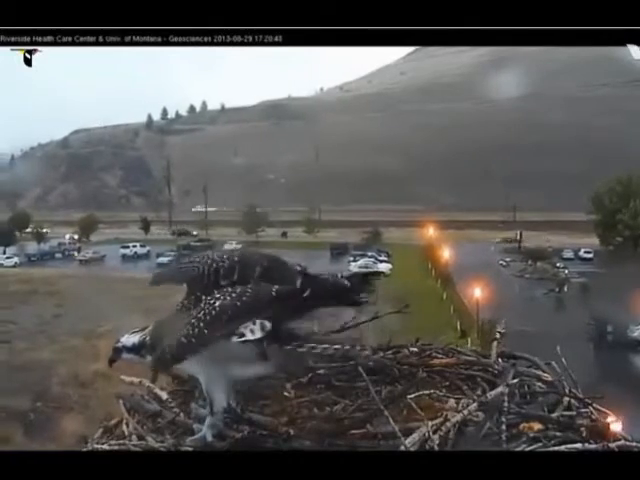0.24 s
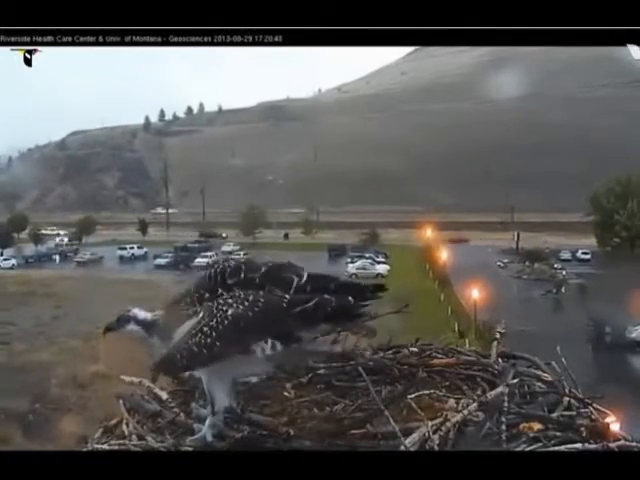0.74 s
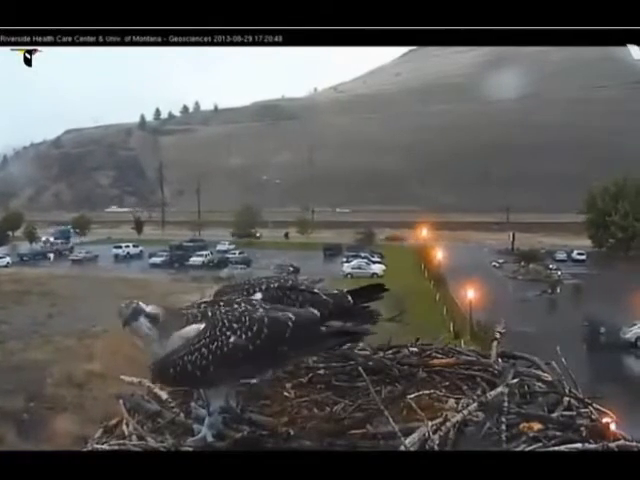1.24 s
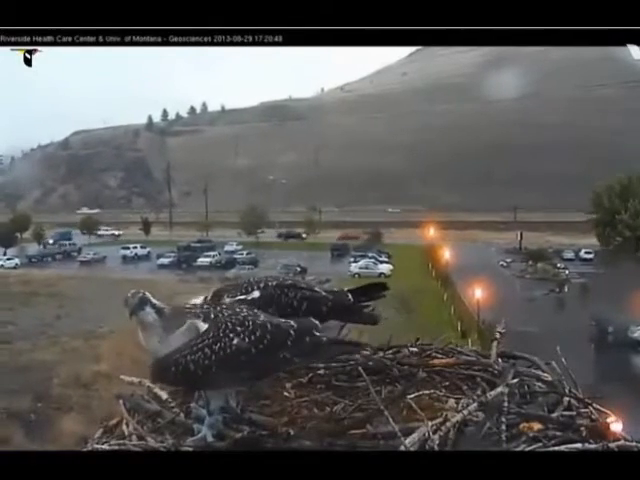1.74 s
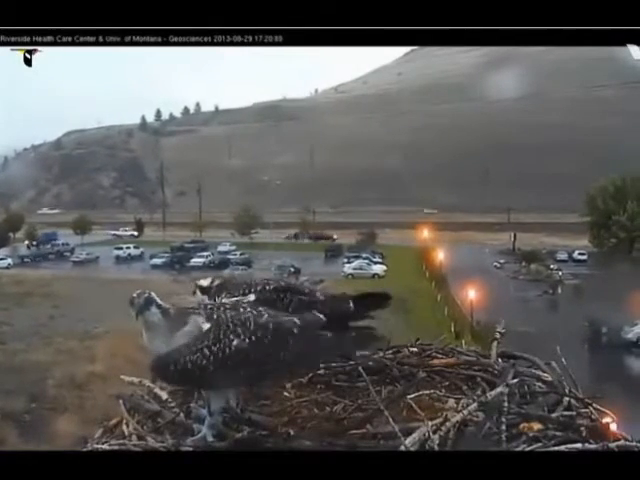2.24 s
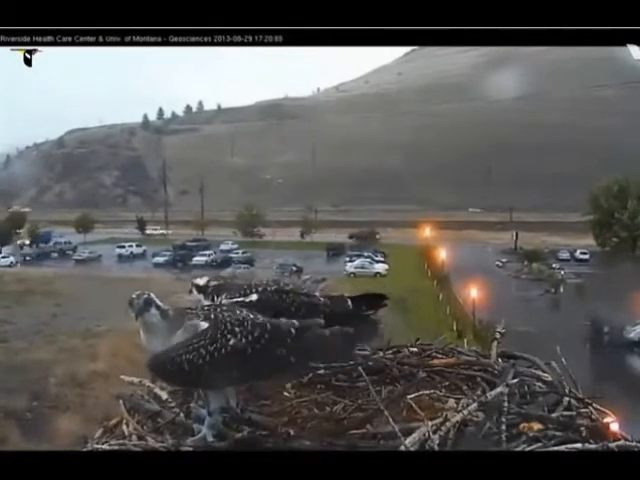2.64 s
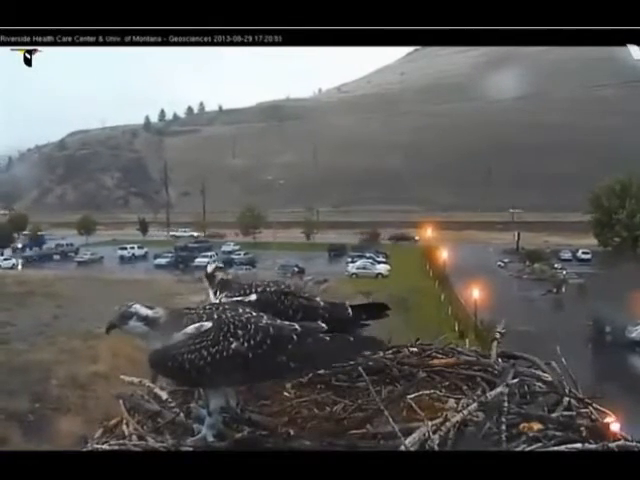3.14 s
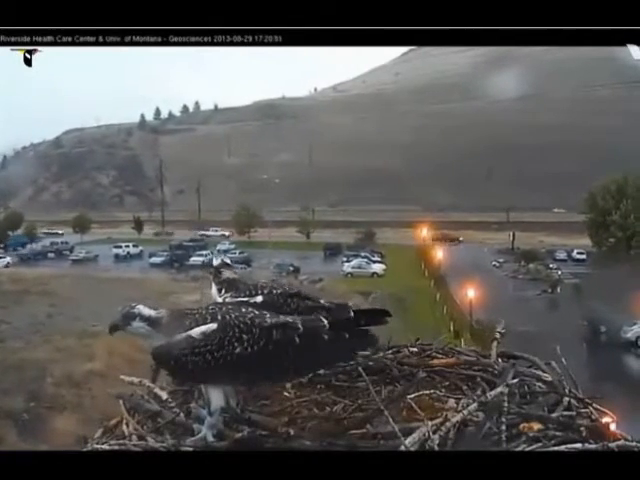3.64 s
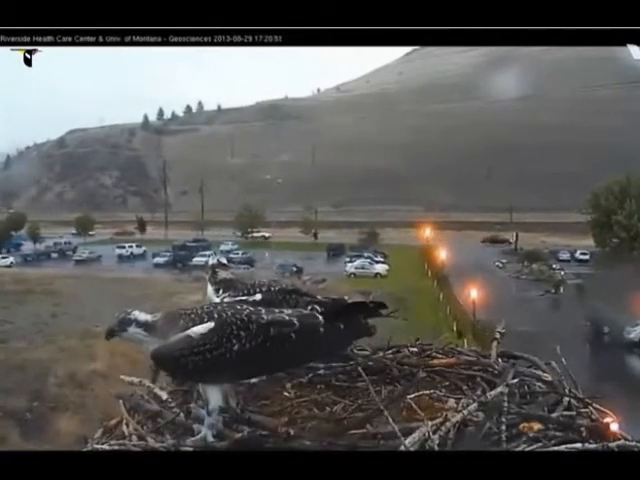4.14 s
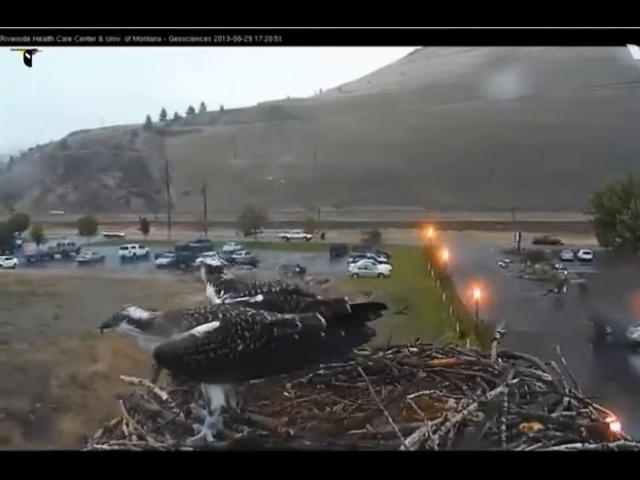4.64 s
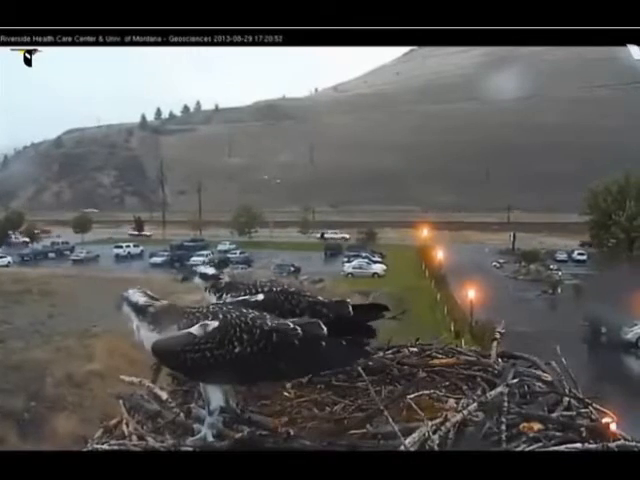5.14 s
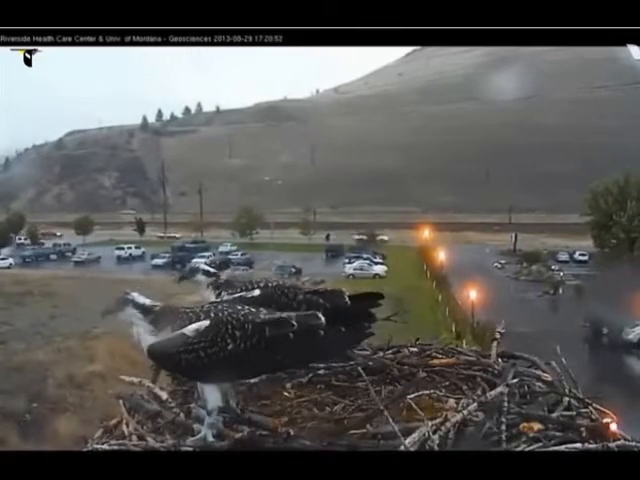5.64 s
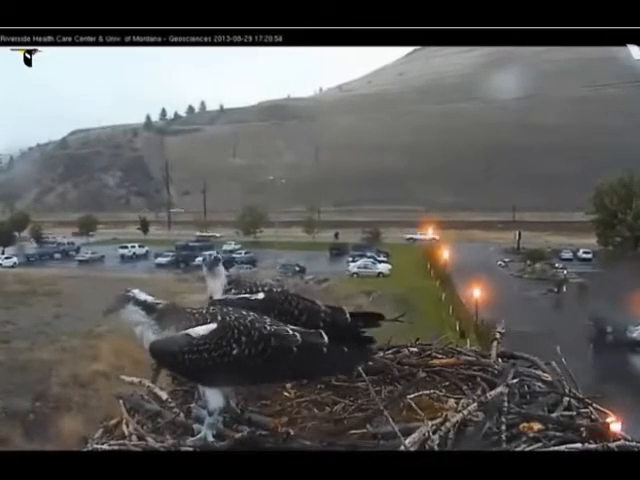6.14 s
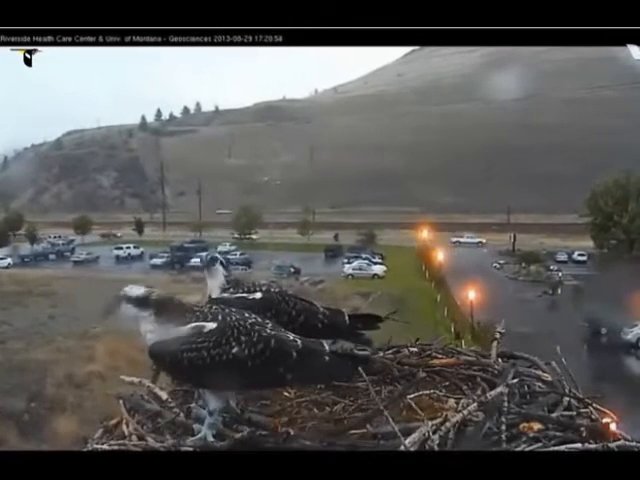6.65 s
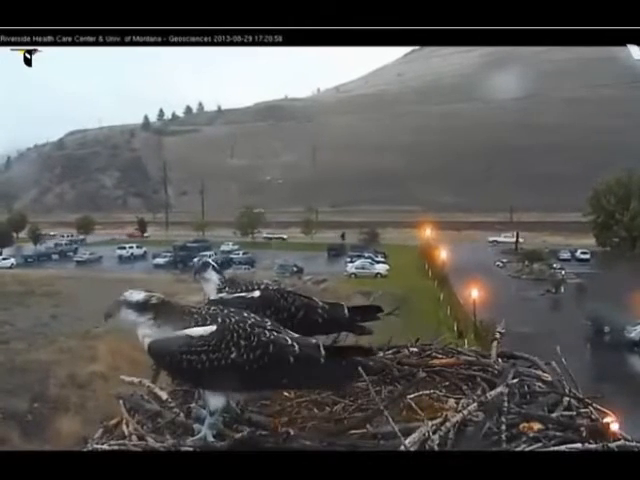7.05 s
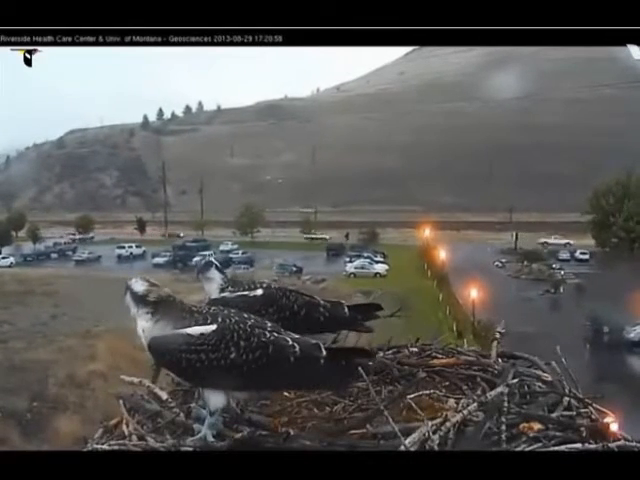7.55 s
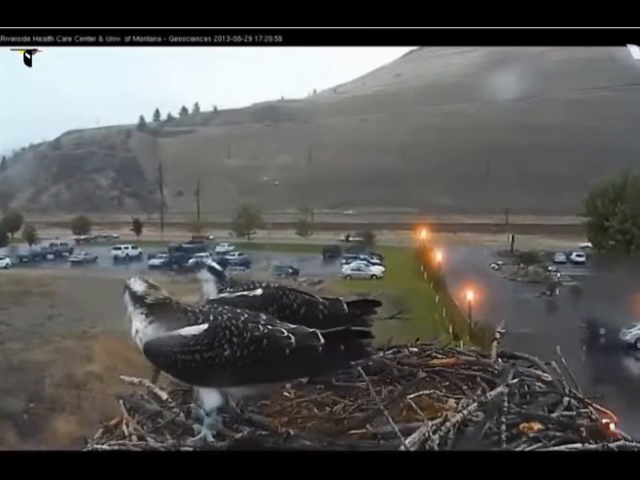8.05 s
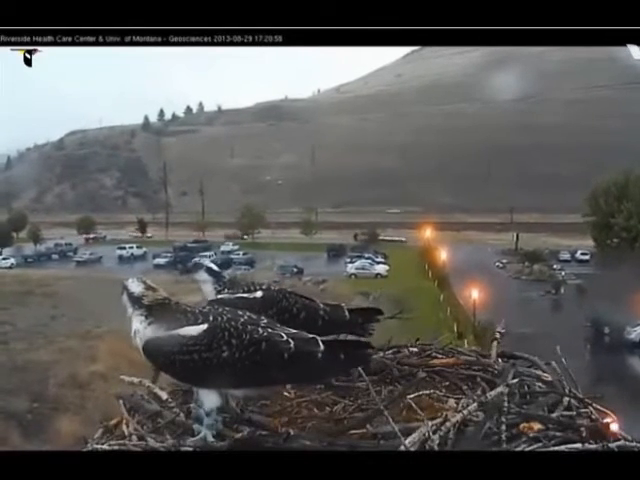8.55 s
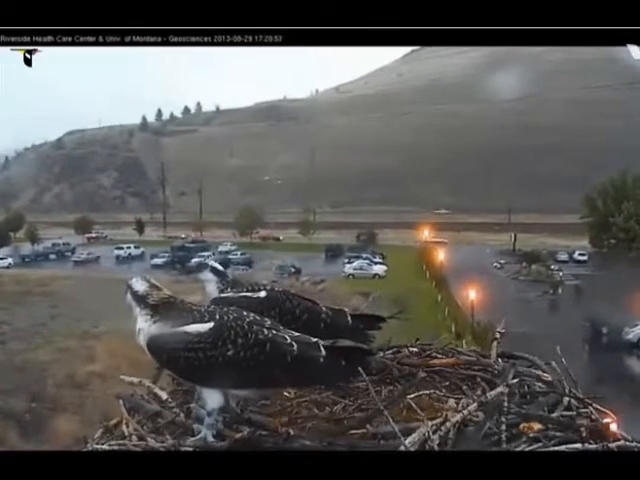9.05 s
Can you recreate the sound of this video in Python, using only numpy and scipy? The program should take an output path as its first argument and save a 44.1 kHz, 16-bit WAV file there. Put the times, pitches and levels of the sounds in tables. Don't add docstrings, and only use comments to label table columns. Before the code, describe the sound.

Close, boxy outdoor sound from a microphone in a weatherproof housing on a high, open nest. From 0 s gusty wind makes a low, lumpy, fluttering roar with dull thuds and momentary choked gaps, over a steady mid-pitched rain hiss that slowly thins. Drops tick and knock on the shell throughout; a heavy hollow drip lands at 0.2 s. Around 1.1 s a gust and a cluster of knocks arrive, and at 1.2 s a bird gives one tiny falling peep, under a tenth of a second. Wind swells again near 2.3 s, with a sharp wet smack at 2.2 s. Hard slams hit at 3.8 and 4.0-4.4 s, with a dense flurry of drops. Gusts peak around 5.4 s; strong drips follow at 5.4, 5.9 and 6.0 s. After 6 s the roar is lower, with a sudden buffet at 7.2 s, quieter near 8.3 s, then another knock at 8.8 s and a thump at 9.1 s.

```python
import sys
import numpy as np
from scipy import signal
from scipy.fft import rfft, irfft
from scipy.io import wavfile

SR = 44100
rng = np.random.default_rng(int(sys.argv[2]) if len(sys.argv) > 2 else 0)


def generate_wav(sig):
    pcm = np.round(np.clip(np.atleast_2d(sig).T, -1, 1) * 32767).astype(np.int16)
    wavfile.write(sys.argv[1], SR, pcm)


def attenuation_scalar(level_db):
    decades = np.asarray(level_db, float) / 20
    return 10 ** decades


N = 409686
RUN_IN = 8192
BURST_LEN = 900

# [t/s, roar level/dB, edge (tearing into upper roar)/dB]
WIND_LEVEL = [(0, -33, -10.5), (.9, -32, -13.5), (1.07, -33, -9.5), (1.65, -38.5, -11.5),
              (2.25, -30.5, -10), (2.68, -38.5, -10.5), (2.93, -32, -16.5), (3.1, -37, -11),
              (3.8, -31.5, -15), (3.9, -35, -10), (4.25, -31, -9), (4.7, -38.5, -14.5), (5.0, -32, -9.5),
              (5.45, -30, -11), (6.1, -36, -8.5), (7.2, -36.5, -9.5), (8.3, -40.5, -6),
              (9.29, -37.5, -13.5)]
# [f/Hz, density/dB per Hz]
RAIN_SPECTRUM = [(900, -29.5), (1300, -5), (1750, -12), (2200, -5), (2570, -3), (3010, -7), (3600, -12),
                 (4990, -24), (6500, -35), (8300, -41), (12000, -48.5), (16000, -76)]


def in_time(rows):
    s, *columns = np.transpose(rows)
    return [np.interp(np.arange(N) / SR, s, c) for c in columns]


def rms_one(x):
    return x / np.sqrt(np.mean(x ** 2) + 1e-20)


def drift(rate_hz):
    step = 20
    r = np.exp(-2 * np.pi * rate_hz * step / SR)
    noise = rng.standard_normal(N // step + 2002)
    slow = signal.lfilter([1], [1, -2 * r, r * r], noise)[2000:]
    return np.interp(np.arange(N) / step, np.arange(len(slow)), rms_one(slow))


def colour(x, spectrum):
    hz, level_db = np.transpose(spectrum)
    grid_hz = np.fft.rfftfreq(16384, 1 / SR) + 1
    cepstrum = irfft(np.log(attenuation_scalar(np.interp(np.log(grid_hz), np.log(hz), level_db))))
    cepstrum[1:8192] *= 2
    cepstrum[8193:] = 0
    response = irfft(np.exp(rfft(cepstrum)))
    return rms_one(signal.fftconvolve(x, response)[RUN_IN:N + RUN_IN])


def white():
    return rng.standard_normal(N + RUN_IN)


def ring(at_s, length_s, hz, t60_s, rise_s):
    t = np.arange(round(length_s * SR)) / SR
    contact = np.sin(np.minimum(t / rise_s, 1) * np.pi / 2) ** 2
    return round(at_s * SR), np.sin(2 * np.pi * hz * t) * attenuation_scalar(-60 * t / t60_s) * contact


def add(out, start, sound):
    out[start:start + len(sound)] += sound[:N - start]


def gusts():
    # [t/s, swell/dB, fall/ms]
    buffets = [(0.601, 5.5, 63), (1.107, 8, 200), (1.181, -4, 65), (1.311, 5, 40), (1.39, 3, 45),
               (1.62, 2, 60), (1.849, 7.5, 12), (2.011, 5.5, 22), (2.131, 3.5, 50), (2.4, 4, 150),
               (2.55, 7, 15), (2.939, 3.5, 30), (3.4, 1.5, 27), (3.7, 2.5, 180), (3.83, 1.5, 30),
               (3.998, 4.5, 58), (4.179, 7, 150), (4.44, 3.5, 65), (4.8, 0.5, 46), (5.42, 2, 40),
               (5.52, 2, 60), (5.88, 4, 16), (6.299, 4, 120), (6.509, 3.5, 21), (6.74, 5.5, 38),
               (6.87, 3, 72), (7.0, 3.5, 84), (7.178, 11, 12), (7.342, 4.5, 24), (7.49, 0.5, 40),
               (7.56, 0.5, 80), (7.68, 1.5, 140), (7.85, 2, 44), (7.96, 3.5, 120), (8.48, 1, 80),
               (8.54, 3, 80), (8.68, 2.5, 60), (9.06, 4, 70), (9.135, 6, 44)]
    rise_s, lull_s, lull_share = 0.0048, 0.042, 0.13
    slow_db = in_time(WIND_LEVEL)[0]
    t, swell_db = np.arange(N) / SR, np.zeros(N)
    for s, size_db, fall_ms in buffets:
        near = slice(round((s - .15) * SR), round((s + .9) * SR))
        since = t[near] - s
        fall = np.exp(-np.maximum(since - rise_s, 0) * 1000 / fall_ms)
        lull = lull_share * np.exp(-(since / lull_s + 1) ** 2)
        swell_db[near] += size_db * (np.clip(since / rise_s, 0, 1) * fall - lull)
    return slow_db, swell_db


def driven_times(shares):
    driven = np.cumsum(attenuation_scalar(gusts()[0][:-SR // 20]))
    return np.searchsorted(driven, shares * driven[-1]) / SR


def input_hiss():
    # [f/Hz, density/dB per Hz]
    noise_spectrum = [(2500, -16), (5000, -0.5), (8300, -4.5), (10000, -13), (12000, -11), (13500, -16),
                      (16000, -39)]
    return attenuation_scalar(-83) * colour(white(), noise_spectrum)


def peep():
    # [t/s, f/Hz, fundamental level/dB, octave level/dB]
    whistle = [
        (1.198, 1813, -68, -80),
        (1.212, 1883, -46, -50),
        (1.225, 1854, -48.5, -43.5),
        (1.234, 1790, -46, -62),
        (1.247, 1700, -51.5, -63),
        (1.256, 1660, -54, -75),
        (1.265, 1640, -77, -99),
    ]
    hz, first_db, octave_db = in_time(whistle)
    phase = 2 * np.pi * np.cumsum(hz) / SR
    t = np.arange(N) / SR
    sounding = (t > whistle[0][0]) & (t < whistle[-1][0])
    return sounding * (attenuation_scalar(first_db) * np.sin(phase) + attenuation_scalar(octave_db) * np.sin(2 * phase))


def rain(eddies):
    # [t/s, hiss level/dB]
    rainfall = [(0.0, -53), (0.46, -53.5), (1.05, -54.5), (1.12, -54.5), (1.4, -55.5), (1.89, -55.5),
                (2.22, -53.5), (2.64, -56), (3.83, -54.5), (4.15, -54), (4.22, -54.5), (4.38, -54.5),
                (4.53, -56.5), (5.59, -55.5), (5.87, -57), (8.12, -56.5), (8.57, -57), (9.29, -57)]
    drops_per_s, buffet_share = 1200, 0.32
    hiss_db, = in_time(rainfall)
    sizes = attenuation_scalar(4.3 * np.minimum(rng.exponential(1, N + RUN_IN), 3.8)) * np.sign(white())
    near = rms_one(sizes * (rng.random(N + RUN_IN) < drops_per_s / SR))
    fall = colour(white() + .52 * near, RAIN_SPECTRUM)
    flung_db = buffet_share * gusts()[1]
    return attenuation_scalar(hiss_db + flung_db + 0.37 + 0.27 * eddies + 0.28 * drift(35)) * fall


def smacks():
    # [t/s, peak level/dB]
    smack_rows = [(0.0774, -48), (0.3554, -52), (1.037, -50), (1.0914, -46), (1.287, -56), (1.3305, -48.5),
                  (1.3608, -50), (1.5778, -49), (1.6036, -52.5), (1.6751, -51.5), (1.7848, -51),
                  (1.823, -52), (1.8324, -54), (2.173, -37.5), (2.2069, -50), (2.4104, -58), (2.4838, -57),
                  (2.9287, -53), (2.9522, -48.5), (3.1802, -57), (3.2186, -55), (3.5194, -53),
                  (3.6526, -53), (3.9492, -45), (4.0158, -45), (4.2033, -47), (4.2976, -54), (4.7092, -49),
                  (5.1287, -53), (5.441, -50), (5.665, -53), (6.4642, -52), (6.7411, -52), (7.0663, -53),
                  (7.8481, -53), (7.9854, -50), (8.0995, -53), (8.3094, -57)]
    band_hz, t60_s, rise_s, trim_db = (3020, 5250), 0.0074, 0.00034, -2
    out, t = np.zeros(N), np.arange(BURST_LEN) / SR
    puffs = rng.standard_normal((len(smack_rows), len(t)))
    puffs = puffs * attenuation_scalar(-60 * t / t60_s) * np.minimum(t / rise_s, 1)
    puffs = signal.sosfilt(signal.butter(3, band_hz, "band", fs=SR, output="sos"), puffs)
    for (s, peak_db), puff in zip(smack_rows, puffs):
        add(out, round(s * SR), attenuation_scalar(peak_db + trim_db) * puff / np.abs(puff).max())
    return out


def splashes():
    # [t/s, peak level/dB, level above 9 kHz re peak/dB]
    splash_rows = [(0.0763, -55, -24), (1.0375, -57, -36), (1.0909, -46, -17), (1.212, -60, -6),
                   (1.222, -60, -8), (1.23, -61, -8), (1.331, -56, -22), (1.786, -58, -22),
                   (3.085, -59, -25), (6.798, -57, -24), (7.338, -59, -28), (8.31, -57, -26),
                   (1.3154, -52, -21), (1.3608, -54, -23), (1.5758, -58.5, -12), (1.6043, -51, -16),
                   (1.9714, -59, -21), (2.0033, -57, -24), (2.172, -50, -15.5), (2.7871, -58, -15),
                   (2.9512, -50.5, -15.5), (3.9487, -51, -24), (4.0153, -50, -21), (4.2033, -52, -18),
                   (4.3765, -48, -26), (4.545, -57, -18), (4.5655, -53, -27), (5.2679, -56, -28),
                   (5.6316, -53, -22), (6.5929, -54, -21), (7.1671, -56, -23), (7.9848, -58, -28),
                   (8.098, -58, -30)]
    spray_count, spray_db, spray_top_db = 22, -62, -21.5
    t60_s, rise_s = 0.0099, .0007
    chance = rng.random((spray_count, 2))
    sprays = [(s, spray_db + 4 * (b - .5), spray_top_db)
              for s, b in zip(driven_times(chance[:, 0]), chance[:, 1])]
    rows = splash_rows + sprays
    mid = signal.butter(2, [5200, 8800], "band", fs=SR, output="sos")
    top = signal.butter(5, [8800, 13600], "band", fs=SR, output="sos")
    out, t = np.zeros(N), np.arange(BURST_LEN) / SR
    bursts = rng.standard_normal((len(rows), len(t))) * attenuation_scalar(-60 * t / t60_s) * np.minimum(t / rise_s, 1)
    for (s, peak_db, top_db), burst in zip(rows, bursts):
        body, fizz = signal.sosfilt(mid, burst), signal.sosfilt(top, burst)
        splash = body / np.abs(body).max() + attenuation_scalar(top_db + 5.0) * fizz / np.abs(fizz).max()
        add(out, round(s * SR), attenuation_scalar(peak_db - 6.5) * splash)
    return out


def knocks():
    # [t/s, peak level/dB, ring f/Hz]
    knock_rows = [(0.143, -41, 2510), (0.192, -35.5, 2460), (0.2192, -39, 2300), (1.0906, -35, 3030),
                  (1.1113, -34.5, 2850), (1.224, -35, 2200), (1.315, -35, 2520), (1.503, -32.5, 2270),
                  (1.5767, -35.5, 2240), (1.644, -40, 2720), (1.7482, -32, 2380), (1.88, -40, 3020),
                  (1.921, -38, 2850), (2.172, -31, 2310), (2.5094, -37.5, 2390), (2.9284, -34, 2300),
                  (2.9507, -33, 2550), (3.5243, -35.5, 2430), (4, -39, 2390), (4.121, -34, 2530),
                  (4.2065, -27.5, 2400), (4.212, -38, 2250), (4.223, -39, 2560), (4.232, -40, 2400),
                  (4.296, -37, 2440), (4.184, -45, 2630), (5.425, -38.5, 2300), (6.519, -44, 2900),
                  (1.118, -40, 2500), (4.2667, -34, 2240), (4.275, -39, 2500), (4.3765, -36, 2140),
                  (4.988, -35, 2230), (5.4202, -32.5, 2210), (5.6316, -37, 2280), (5.663, -37, 2930),
                  (6.387, -39, 2440), (6.796, -34, 2250), (7.1672, -39, 2980), (8.758, -37, 2230),
                  (0.6624, -35.5, 2130), (1.333, -38, 2000), (1.3902, -47, 3000), (1.4087, -40, 2610),
               (1.6048, -40, 2500), (1.6751, -39, 3020), (1.942, -39, 2400), (1.9794, -39, 2480),
               (2.044, -39, 2540), (2.2094, -43, 2280), (3.3827, -39, 2460), (3.7514, -38, 2280),
               (3.9543, -38, 2370), (4.0487, -42, 2290), (4.4403, -46, 2350), (4.4852, -50, 2300),
               (4.7257, -39, 2880), (4.8928, -45, 2320), (5.1277, -41, 2480), (5.389, -40, 2130),
               (5.449, -37, 2270), (5.5598, -37, 2380), (5.7788, -50, 2230), (5.895, -42, 2300),
               (6.1399, -38, 2430), (6.4986, -40, 2980), (6.6124, -37, 2270), (6.7421, -40, 2450),
               (7.0569, -49, 2340), (7.0988, -46, 2190), (7.1227, -43, 2460), (7.9493, -49, 2500),
               (8.1798, -43, 2950), (8.2033, -45, 2440)]
    tap_count, tap_db, tap_spread_db, tap_low_hz, tap_high_hz = 110, -47, 5, 2100, 3130
    crack_db, crack_follows = -66, .3
    chance = rng.random((tap_count, 3))
    taps = [(s, tap_db - tap_spread_db * b, tap_low_hz + (tap_high_hz - tap_low_hz) * c)
            for s, (_, b, c) in zip(driven_times(chance[:, 0]), chance)]
    muffle = signal.butter(4, 3500, fs=SR, output="sos")
    water = signal.sosfilt(muffle, colour(white(), RAIN_SPECTRUM))
    out, t = np.zeros(N), np.arange(BURST_LEN) / SR
    burst = np.minimum(t / 0.0018, 1) * attenuation_scalar(-60 * t / 0.037)
    for s, peak_db, hz in knock_rows + taps:
        start, knock = ring(s, .04, hz, 0.032, 0.0025)
        crack = ring(s, .04, 1.4 * hz, 0.0027, .0002)[1]
        add(out, start, attenuation_scalar(peak_db - 4.5) * knock)
        add(out, start, attenuation_scalar(crack_db + crack_follows * (peak_db + 35.5)) * crack)
        add(out, start, attenuation_scalar(peak_db - 7.0) * burst * water[start:start + len(t)])
    return out


def drips():
    # [t/s, peak level/dB, ring f/Hz]
    drip_rows = [(0.219, -16, 760), (0.602, -41, 791), (0.767, -35, 751), (4.013, -16, 853),
                 (4.211, -27, 826), (4.439, -34, 778), (5.055, -28, 845), (5.46, -33, 1070),
                 (5.51, -33, 775), (5.564, -35, 751), (5.804, -37, 1000), (5.894, -14.5, 996),
                 (5.997, -15.5, 754), (6.743, -28, 896), (8.759, -19, 826), (4.25, -30, 1270),
                 (5.422, -16, 1100)]
    out = np.zeros(N)
    for s, peak_db, hz in drip_rows:
        start, drip = ring(s, .04, hz, 0.027, 0.0016)
        add(out, start, attenuation_scalar(peak_db - 10.0) * drip)
    return out


def slams():
    # [t/s, peak level/dB, f/Hz]
    slam_rows = [(0.459, -26, 436), (0.6, -18, 385), (0.766, -20, 318), (1.118, -18, 490),
                 (1.138, -21, 388), (1.277, -25, 520), (1.624, -20, 493), (2.041, -22, 333),
                 (2.164, -16, 350), (2.982, -29, 509), (3.394, -21, 428), (3.841, -9, 307),
                 (3.919, -21, 568), (4.044, -14.5, 327), (4.088, -24, 310), (4.203, -11, 413),
                 (4.21, -13, 610), (4.437, -13.5, 437), (4.592, -22, 506), (5.329, -16, 290),
                 (5.395, -17, 280), (5.4197, -10.5, 426), (5.89, -15, 520), (5.992, -22, 374),
                 (6.316, -15, 364), (6.45, -18.5, 607), (6.741, -17, 434), (6.814, -17, 500),
                 (7.497, -17.5, 369), (7.85, -17.5, 485), (7.977, -23, 600), (8.756, -34, 455),
                 (9.135, -15.5, 418), (0.037, -15.5, 382), (0.224, -17, 420), (0.401, -14, 315),
                 (0.543, -19, 517), (1.196, -14, 396), (2.543, -14.5, 361), (2.961, -19, 415),
                 (3.999, -22, 415), (4.119, -22, 466), (4.971, -20, 347), (5.685, -18, 333),
                 (6.055, -18, 466), (6.702, -16.5, 304), (6.869, -18.5, 400), (7.166, -18, 352),
                 (7.235, -19, 365), (8.709, -22, 374), (5.36, -16, 300)]
    hush_peak_db, hush_s = 3, 0.005
    thuds, hush_db, t = np.zeros(N), np.zeros(N), np.arange(N) / SR
    for s, peak_db, hz in slam_rows:
        start, thud = ring(s, .04, hz, 0.027, 0.00074)
        add(thuds, start, attenuation_scalar(peak_db - 4.0) * thud)
        near = slice(start - 900, start + 900)
        hush_db[near] += hush_peak_db * np.exp(-((t[near] - s) / hush_s + 0.34) ** 2)
    low_cut = signal.butter(4, 170, "high", fs=SR, output="sos")
    return signal.sosfilt(low_cut, thuds), hush_db


def wind(eddies):
    # [f/Hz, density/dB per Hz]
    low_spectrum = [(15, -54), (28, -17.5), (45, -37), (64, -52.5), (86, -33.5), (165, -13.5), (260, -2),
                    (315, 1), (506, -0.5), (1100, -19.5), (1430, -33), (2420, -120)]
    # [f/Hz, density/dB per Hz]
    upper_spectrum = [(380, -34), (650, 2), (1070, -6), (1580, -21), (2400, -21.5), (3120, -46.5),
                      (5280, -120)]
    upper_buffet_share = 0.71
    slow_db, swell_db = gusts()
    upper_db = in_time(WIND_LEVEL)[1] + (upper_buffet_share - 1) * swell_db
    low = colour(white(), low_spectrum) * attenuation_scalar(0.42 * eddies + 1.12 * drift(61))
    flutter_db = 1.6 * eddies + 1.5 * drift(30)
    upper = colour(white(), upper_spectrum) * attenuation_scalar(upper_db - 1.5 + flutter_db)
    thuds, hush_db = slams()
    return attenuation_scalar(slow_db + swell_db - hush_db) * (low + upper) + thuds


def choke():
    # [t/s, loss/dB, length/ms]
    choke_rows = [(0.133, 13, 8), (0.213, 11, 6), (0.345, 6, 6), (0.408, 6, 5), (0.45, 12, 12),
                  (0.593, 10, 14), (0.711, 11, 7), (0.761, 7, 12), (0.897, 8, 7), (0.996, 11, 8),
                  (1.355, 8, 9), (1.402, 9, 12), (1.867, 10, 6), (1.96, 11, 10), (2.022, 6, 6),
                  (2.131, 7, 7), (2.16, 8, 5), (2.197, 13, 12), (2.235, 6, 4), (2.3, 6, 4), (2.457, 9, 9),
                  (4.196, 13, 12), (4.292, 8, 5), (4.362, 10, 6), (4.427, 12, 16), (4.554, 8, 9),
                  (5.036, 7, 13), (5.378, 12, 12), (5.411, 10, 5), (5.438, 7, 4), (5.505, 6, 4),
                  (5.554, 11, 11), (5.621, 10, 5), (5.754, 10, 11), (5.987, 15, 13), (6.732, 9, 13),
                  (6.809, 11, 10), (7.444, 7, 11)]
    t, loss_db = np.arange(N) / SR, np.zeros(N)
    for s, depth_db, ms in choke_rows:
        near = slice(max(round((s - .04) * SR), 0), round((s + .04) * SR))
        since = t[near] - s
        loss_db[near] += 0.87 * depth_db * np.exp(-np.abs(since / (ms * 0.00048)) ** 3)
        after = since - ms * 0.00068
        surge = np.clip(after / 0.0011, 0, 1) * np.exp(-np.abs(after) / 0.0052)
        loss_db[near] -= 0.24 * depth_db * surge
    pressure = drift(70) * attenuation_scalar(.5 * (sum(gusts()) + 33))
    squeeze_db = 6 * np.clip(pressure - 1.8, 0, 1.5)
    return attenuation_scalar(-loss_db - squeeze_db)


def scene():
    eddies = drift(17.0)
    weather = wind(eddies) + rain(eddies)
    drops = drips() + knocks() + splashes() + smacks()
    return (weather * choke() + drops + peep())[None]


def top_cut(x):
    return signal.sosfilt(signal.butter(12, 14900, fs=SR, output="sos"), x)


def record(dry):
    low_cut = signal.butter(2, 85, "high", fs=SR, output="sos")
    mix = signal.sosfilt(low_cut, dry) + input_hiss()
    return top_cut(mix)


dry = scene()
out = record(dry)
generate_wav(out)
```